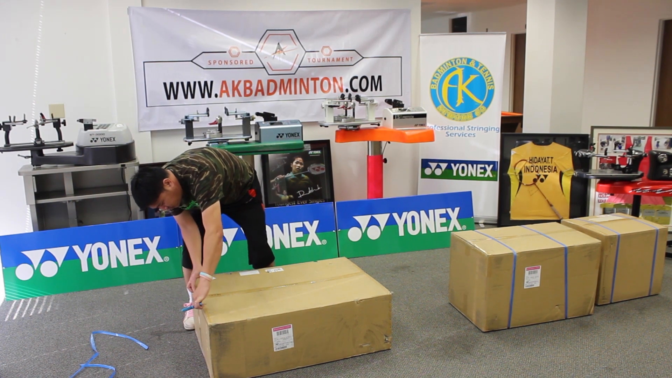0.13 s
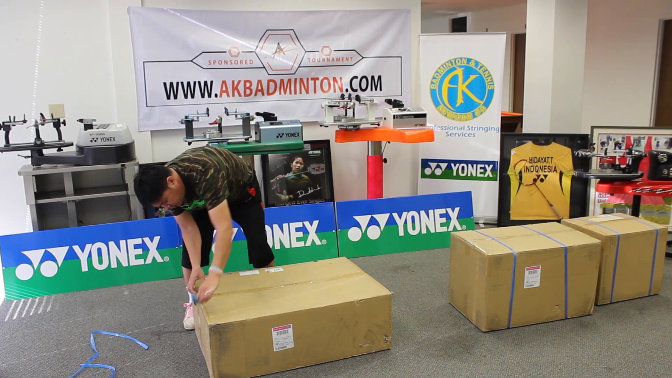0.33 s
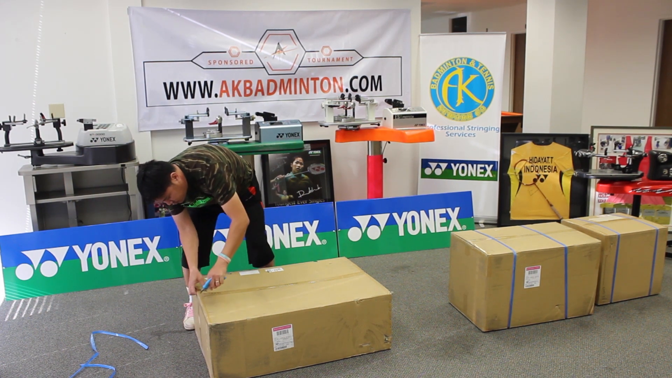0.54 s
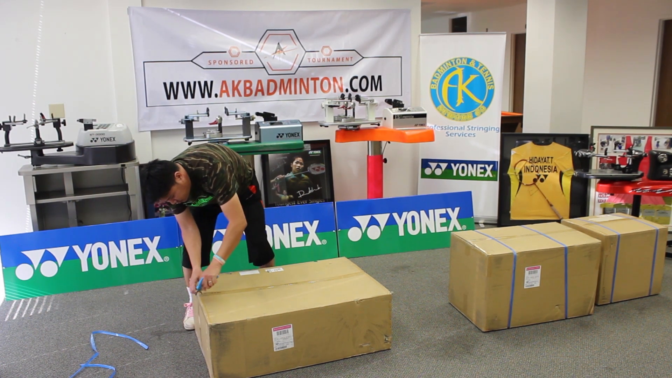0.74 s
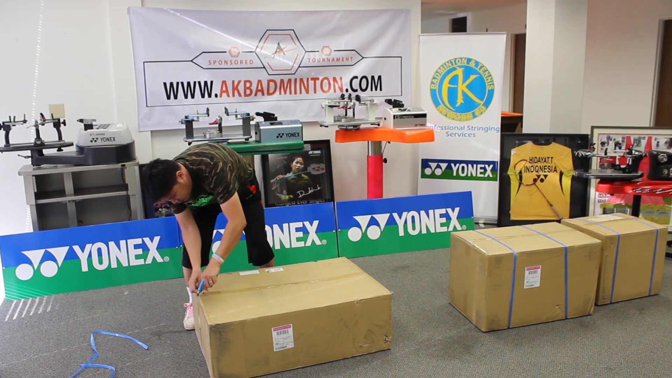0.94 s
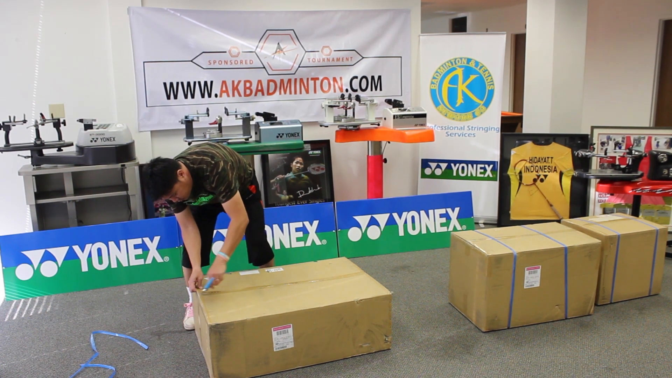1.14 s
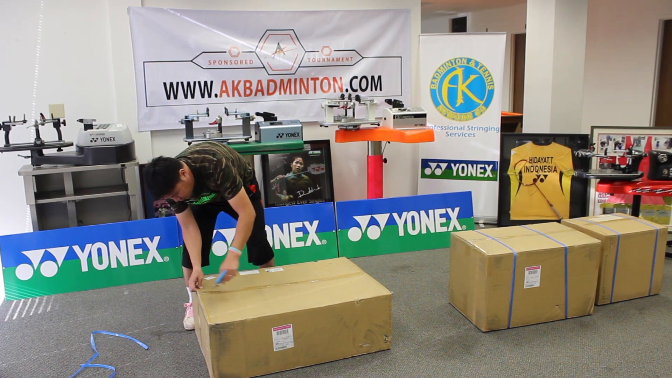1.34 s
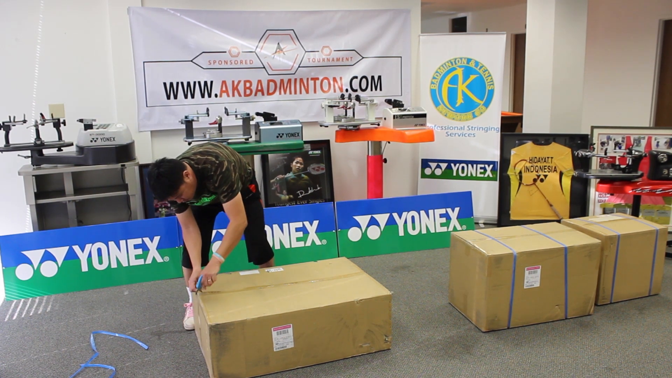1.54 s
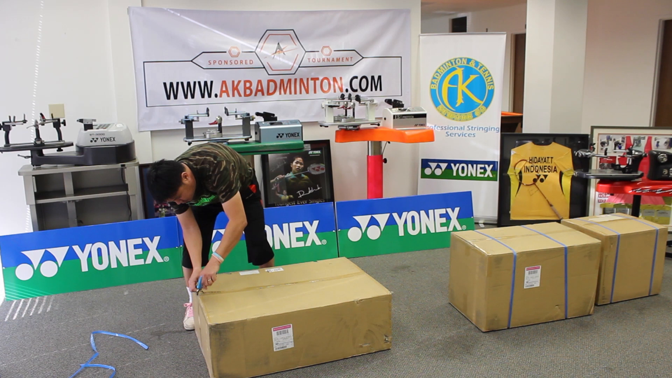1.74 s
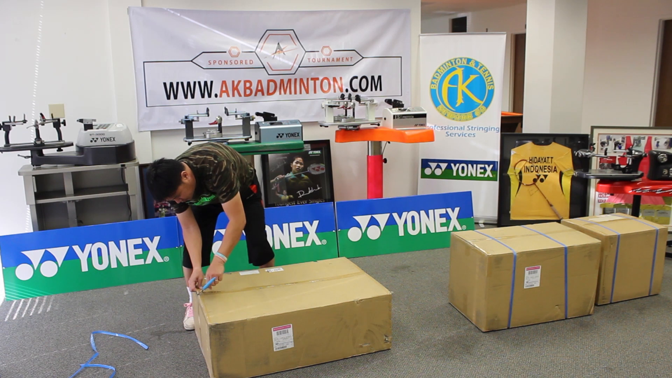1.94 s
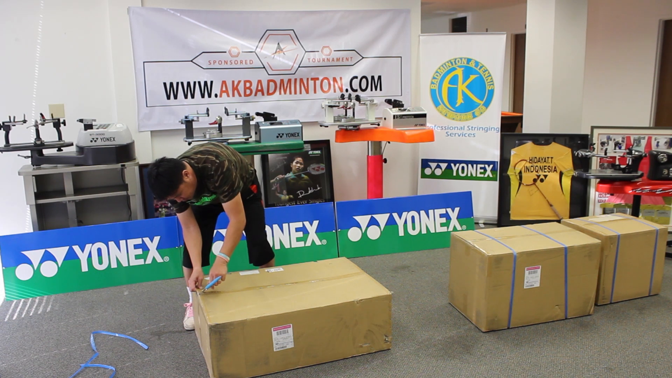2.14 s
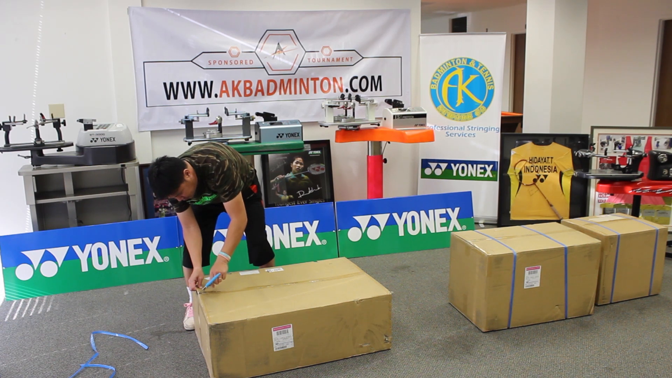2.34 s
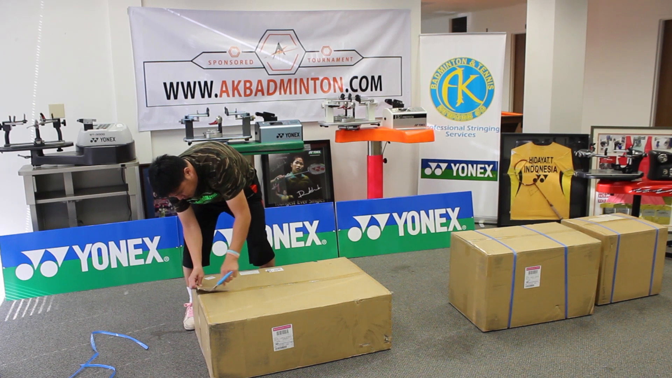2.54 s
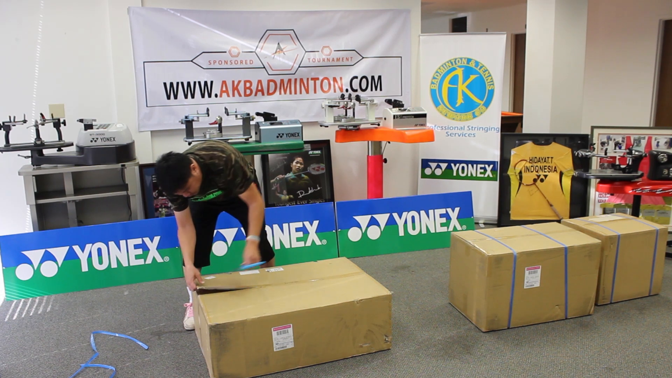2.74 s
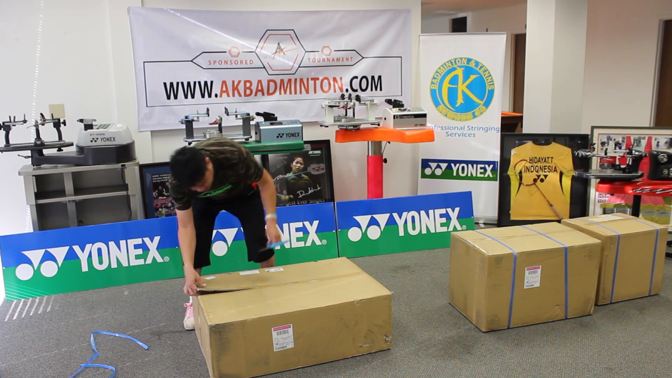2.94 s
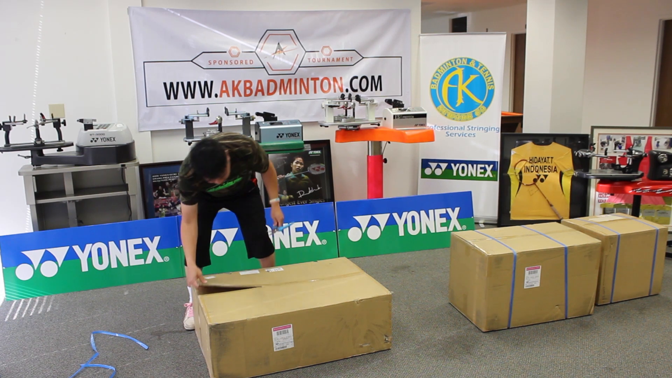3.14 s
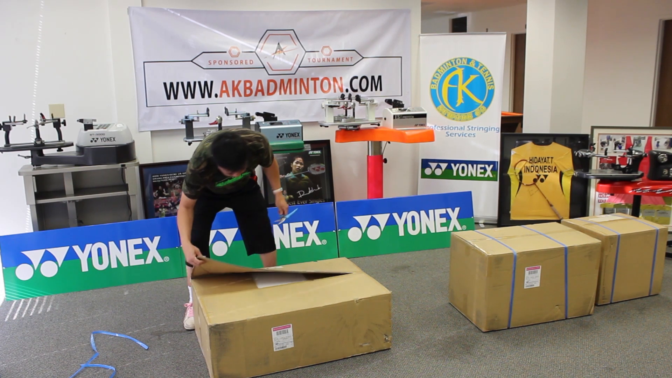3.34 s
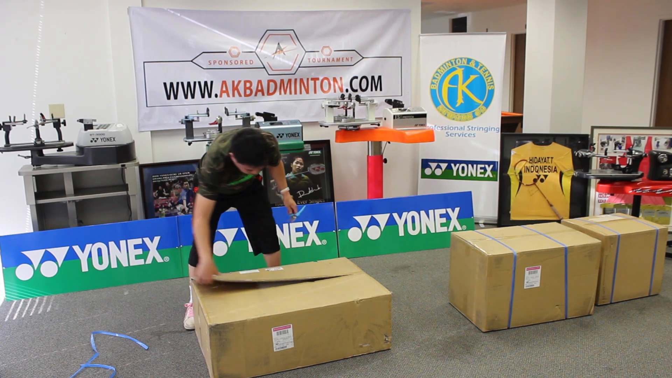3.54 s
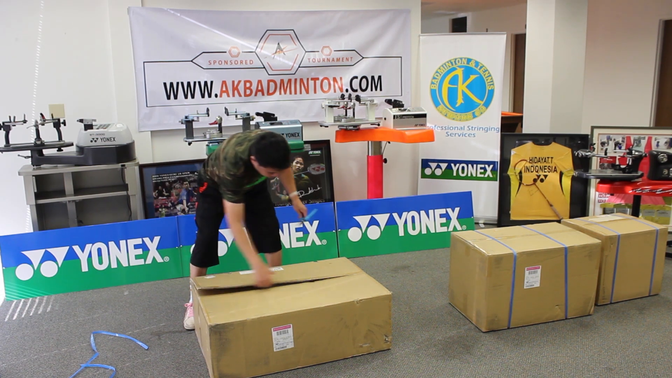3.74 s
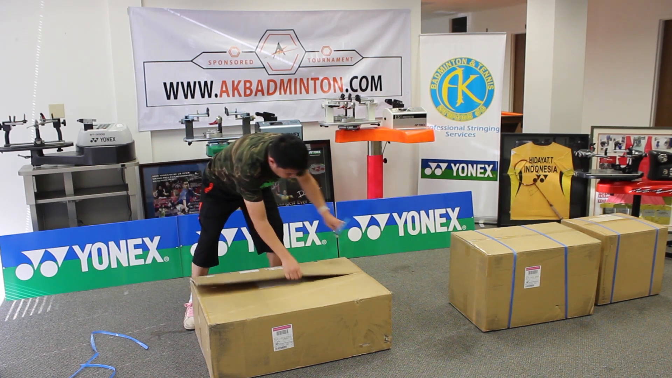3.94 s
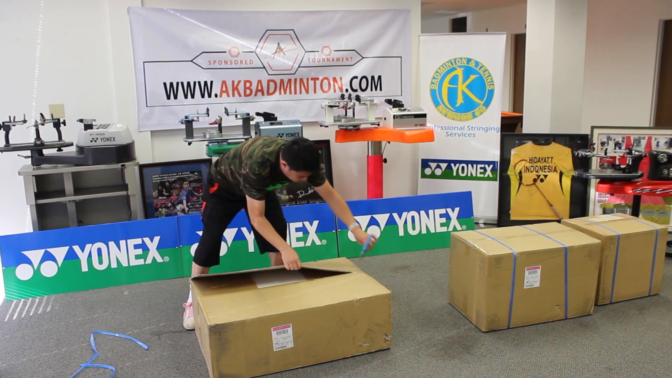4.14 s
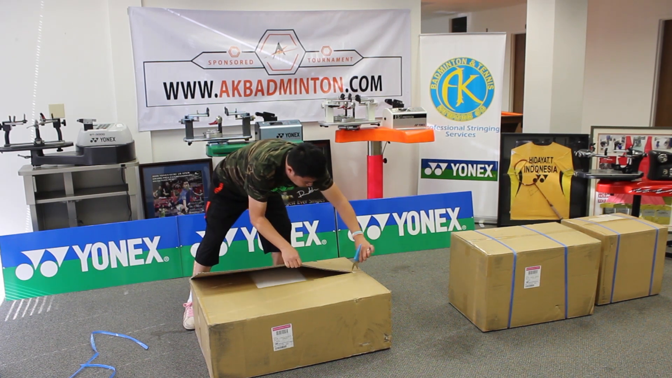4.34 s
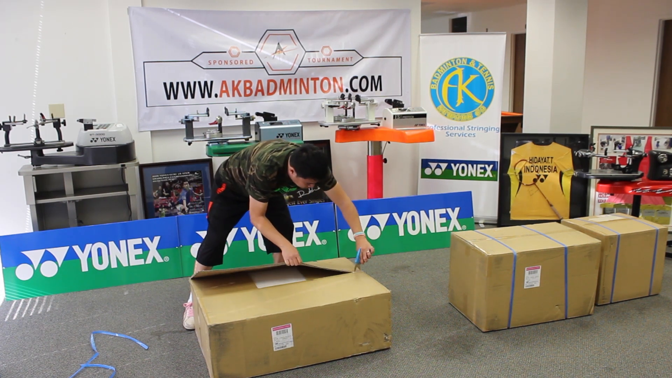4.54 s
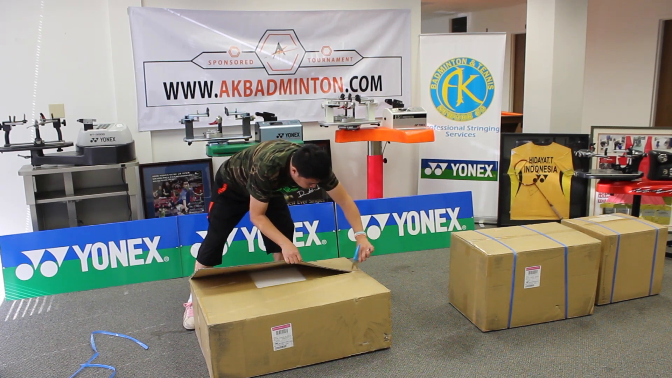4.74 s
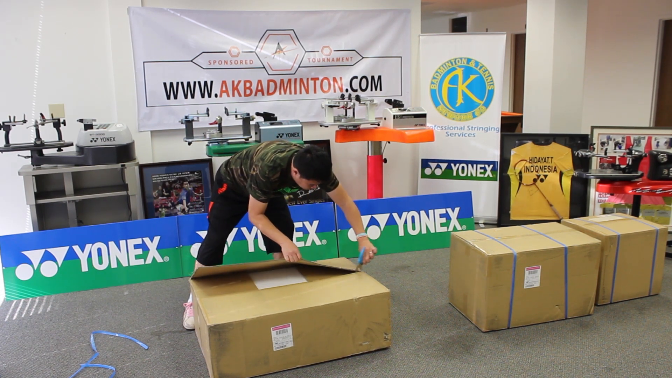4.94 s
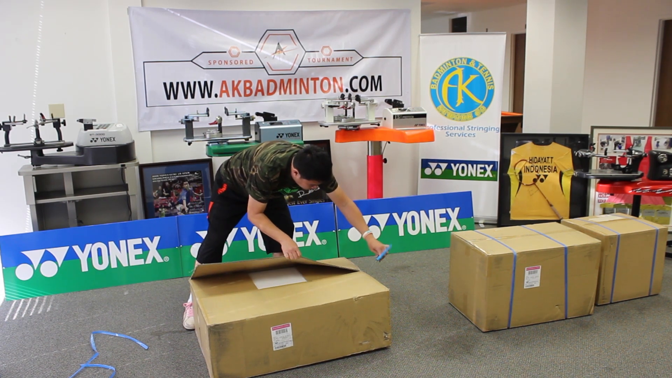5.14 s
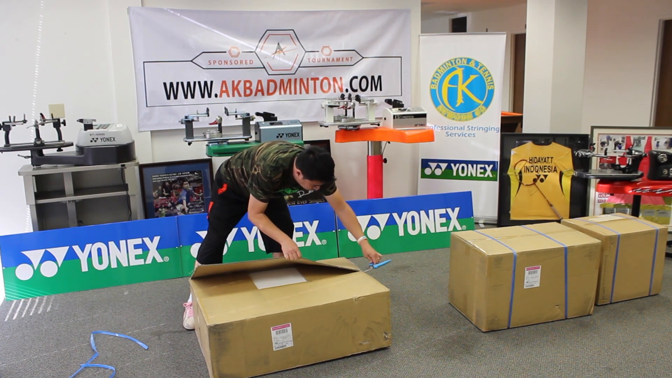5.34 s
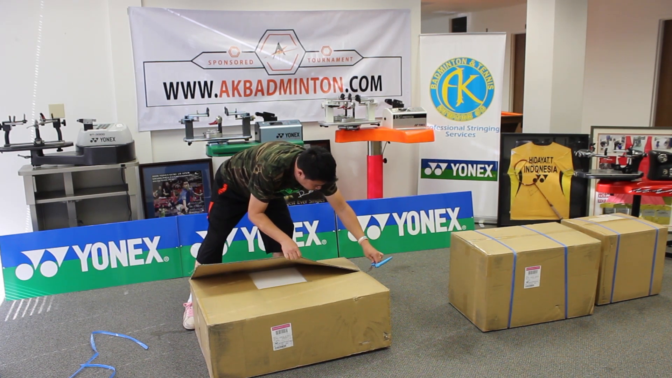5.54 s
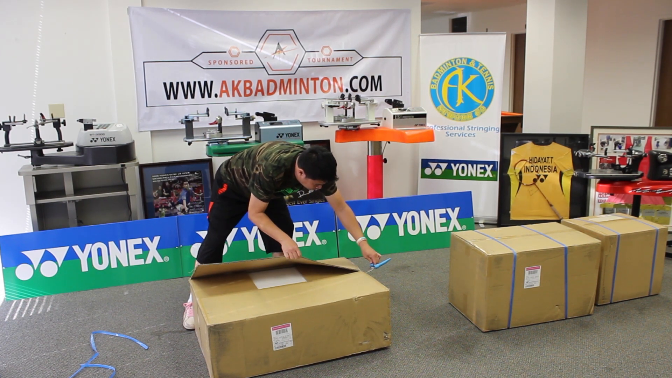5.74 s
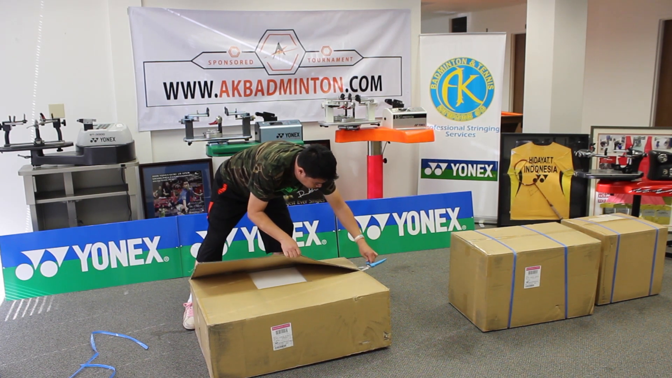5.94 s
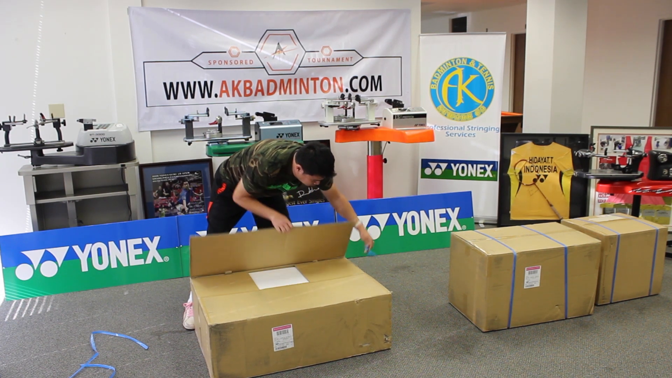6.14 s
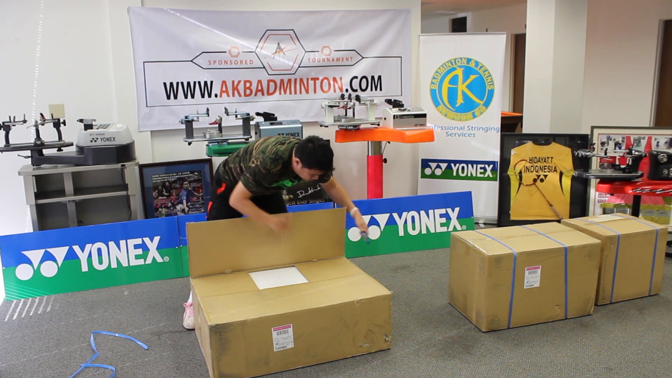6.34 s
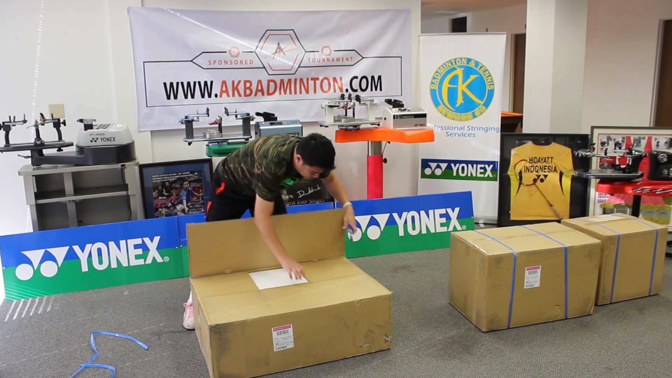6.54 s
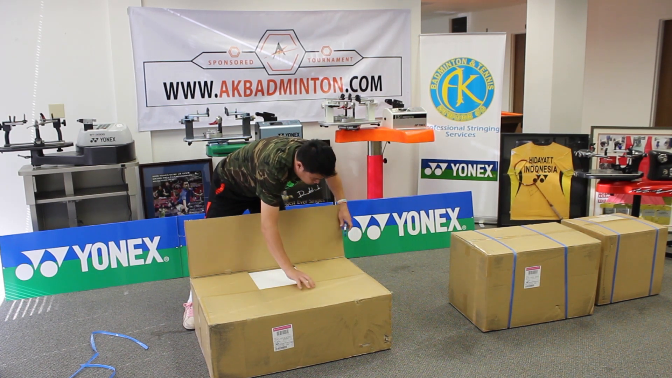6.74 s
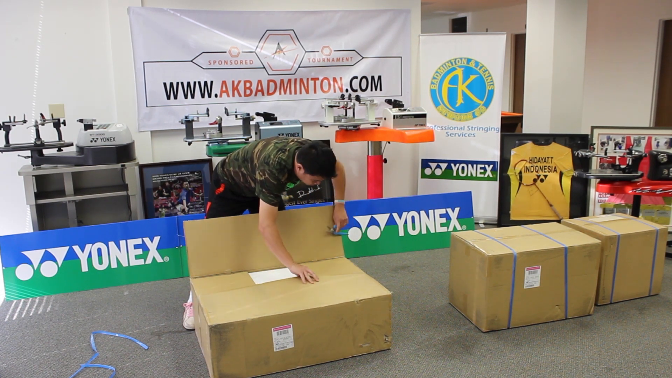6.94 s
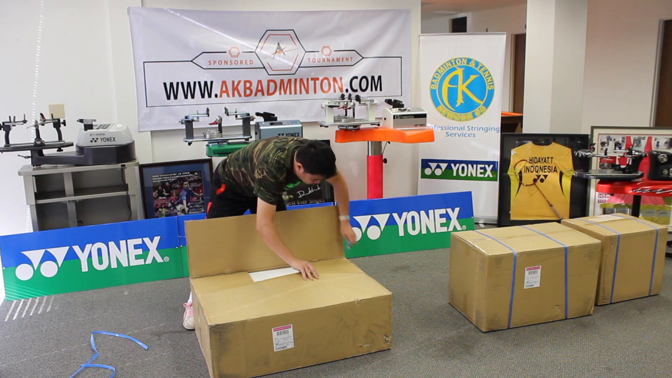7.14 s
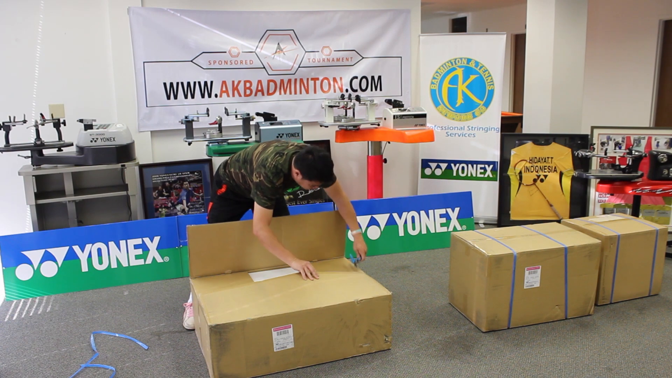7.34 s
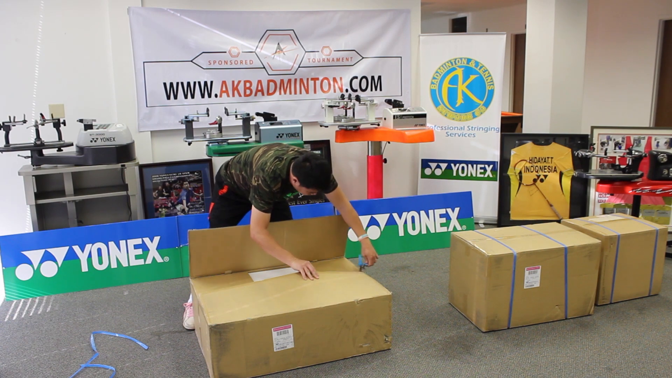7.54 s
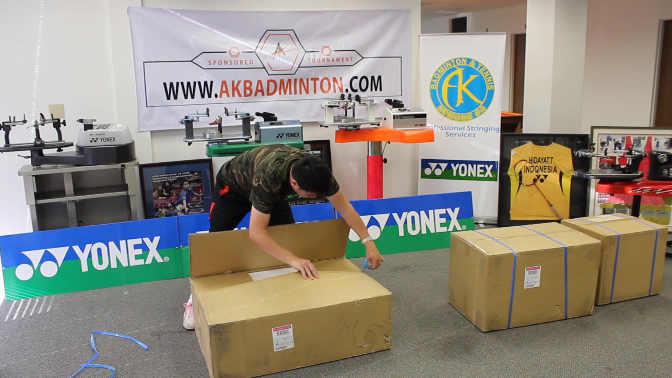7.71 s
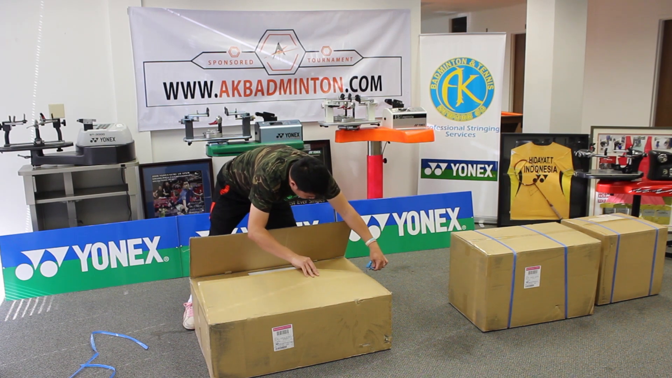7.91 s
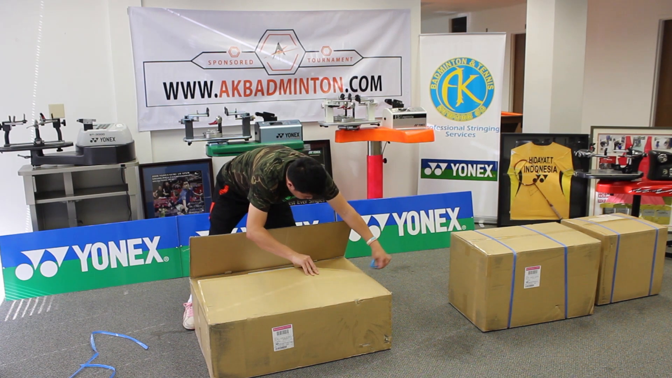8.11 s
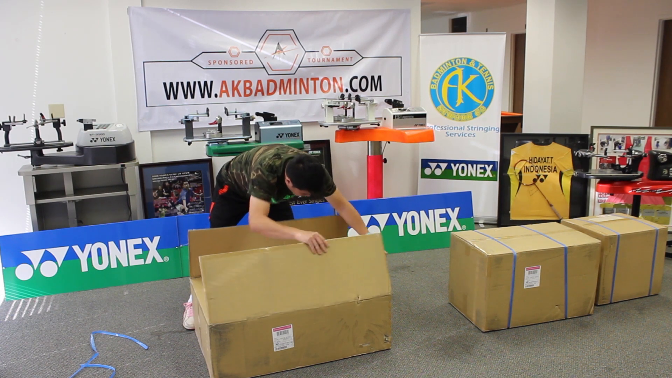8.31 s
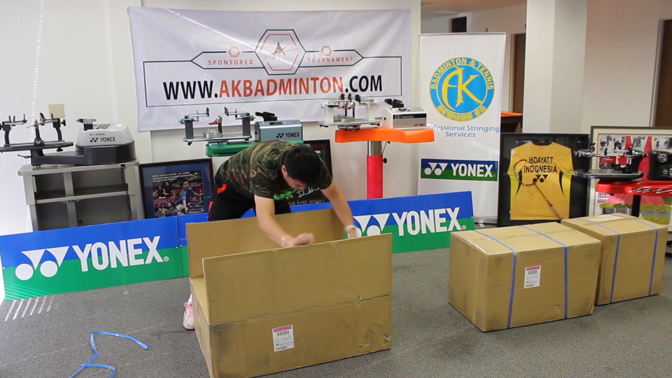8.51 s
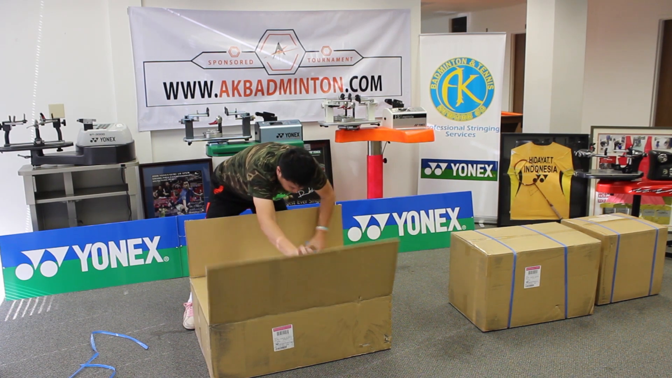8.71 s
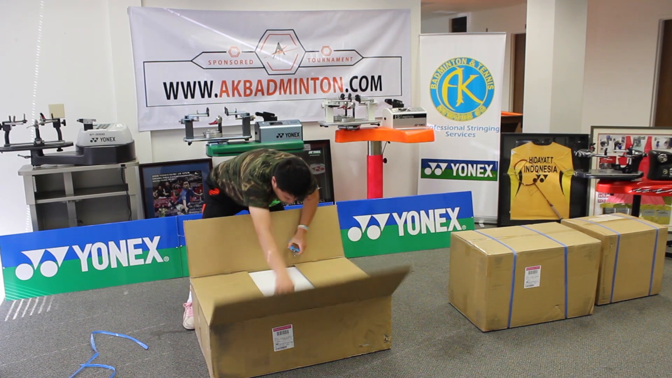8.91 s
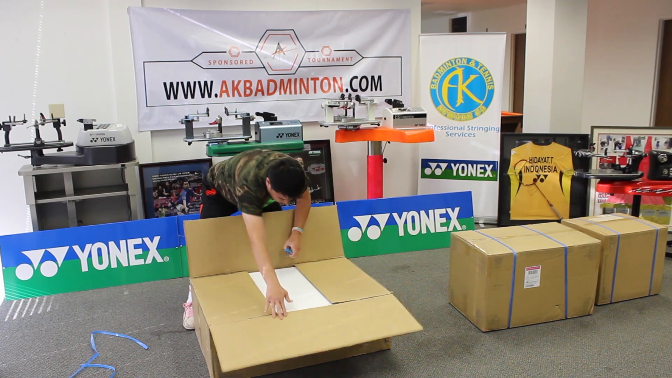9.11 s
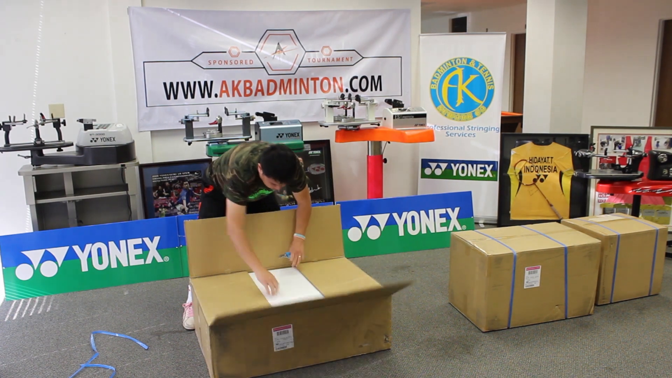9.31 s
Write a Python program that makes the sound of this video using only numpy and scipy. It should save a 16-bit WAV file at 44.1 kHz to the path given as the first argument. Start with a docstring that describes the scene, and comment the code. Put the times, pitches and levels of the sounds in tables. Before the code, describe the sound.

Dry tape crackle and cardboard rubbing come first, with a low hollow drone as the box shifts. Tape tears quickly, then lets go in loud cracks. Quieter fumbling follows, broken by one very short snap, a clustered flap pop, and later two more bursts of flaps pulled up. Roomy, slightly distant camera sound in a shop, with constant ventilation hum and fine hiss.

```python
"""A shop floor, where a large cardboard box is opened a few metres from a camera.
Tape rips and snaps, flaps knock, rub and creak: tiny slips ring the resonances of tape, paper and box.
The box drones as it shifts, over a steady air hum; the shop answers all box sounds with echoes and a tail.
The camera adds a separate hiss to each channel, turns loud sound down, clips its peaks and cuts the top treble."""
import sys
import numpy as np
from scipy import signal
from scipy.fft import rfft, irfft, next_fast_len
from scipy.io import wavfile
from scipy.ndimage import uniform_filter1d

SR = 44100
rng = np.random.default_rng(int(sys.argv[2]) if len(sys.argv) > 2 else 0)


def wav_out(sig):
    """Save sig, one row per channel (or a flat mono array), as 16-bit PCM at SR to the path in sys.argv[1]."""
    wavfile.write(sys.argv[1], SR, np.round(np.clip(np.atleast_2d(sig).T, -1, 1) * 32767).astype(np.int16))


N = 413216

# Ringing tones of the cardboard walls and flaps. Each row: pitch in Hz, time to die by 60 dB in seconds,
# relative level in dB.
WALL_TONES = [(196.4, 0.078, -4.5), (236.7, 0.099, 3), (284, 0.075, 2), (342, 0.2, 0), (393.7, 0.18, 0.5),
              (428.4, 0.31, 1), (488, 0.068, 1)]
FLAP_TONES = [(572.6, 0.058, -7), (676.4, 0.065, -5.5), (746.5, 0.044, -7.5), (867, 0.026, -5),
              (1001, 0.018, -12.5), (1095, 0.1, -5)]


def undb(db):
    """Turn dB into an amplitude factor."""
    return 10 ** (np.asarray(db, float) / 20)


def unit(x):
    """Scale a sound to an rms of 1."""
    return x / np.sqrt(np.mean(x ** 2))


def swell(s, rise, fall):
    """Gain that climbs evenly in dB to 1 at s and sinks again."""
    edge_db = 19.5  # level below the top one rise before s and one fall after it
    t = np.arange(N) / SR - s
    distance = np.maximum(-t / max(rise, .002), t / max(fall, .002))
    return undb(-edge_db * np.clip(distance, 0, 6))


def slips(per_s, spread_db, fill):
    """Tiny slips of very uneven size at random moments, mixed with smooth friction noise."""
    hit = rng.random(N) < per_s / SR
    size = undb(spread_db * rng.exponential(size=N)) * rng.standard_normal(N)
    return unit(unit(hit * size) + fill * rng.standard_normal(N))


def parts(crackle, bright, knock, depth):
    """Levels of the eight parts in dB: brightness tilts tape and paper, depth tilts the box to its bass."""
    # Base levels in dB for tape dull, tape bright, paper dull, paper bright.
    crackle_db = [0, 4, 1, -7.5]
    # Base levels in dB for flaps, walls, hollow, boom.
    knock_db = [-0.5, -3.5, -10.5, -13.5]
    # Where the crackling parts lie, in octaves above the tape's middle.
    crackle_octaves = [-0.3, 0.58, 1.91, 2.5]
    # Where the knocking parts lie, in octaves below the flaps.
    knock_octaves = [0, 1.8, 2.5, 3.2]
    # Hard knocks favour the walls over the bass: dB gained by each knocking part per dB above a usual knock.
    knock_growth = [1.025, 1.132, 0.81, 0.99]
    usual_knock_db = -40

    light = crackle + np.add(crackle_db, bright * np.array(crackle_octaves))
    grown_knock = (knock - usual_knock_db) * np.array(knock_growth) + usual_knock_db
    heavy = grown_knock + np.add(knock_db, depth * np.array(knock_octaves))
    return np.r_[light, heavy]


def ring(x, shapes):
    """Sum of resonances (Hz, width Hz, dB); white noise of rms 1 comes out with rms near 1."""
    out, power = 0, 0
    for k, (hz, width, db) in enumerate(shapes):
        b, a = signal.iirpeak(hz, hz / width, fs=SR)
        sign = (-1) ** k  # neighbours ring in opposite polarity
        out = out + sign * undb(db) * signal.lfilter(b, a, x)
        power += undb(db) ** 2 * np.pi * width / SR
    return out / np.sqrt(power)


def widths(modes):
    """A mode that dies 60 dB in t60 is ln(1000) / (pi t60) Hz wide."""
    return [(hz, np.log(1000) / (np.pi * t60), db) for hz, t60, db in modes]


def hum():
    """Steady air handling and far street noise: random noise coloured by a fixed spectrum."""
    # Tone colour of the hum. Each row: frequency in Hz, relative spectral level in dB per Hz.
    colour_points = [(15, -44), (25, -14), (65, -1.5), (92, -10.5), (171, -11), (324, -16.5), (826, -14),
                     (889, -13.5), (1080, -12), (1350, -16.5), (2050, -24.5), (2900, -16), (3900, -24),
                     (4980, -19.5), (9000, -27.5), (11700, -24), (19800, -120)]
    level_db = -52.5  # rms
    hz, db = np.transpose(colour_points)
    size = next_fast_len(N)
    bins = np.fft.rfftfreq(size, 1 / SR) + 1  # 1 Hz up, to keep the logarithm finite
    colour = undb(np.interp(np.log(bins), np.log(hz), db))
    noise = irfft(rfft(rng.standard_normal(size)) * colour, size)[:N]
    return undb(level_db) * unit(noise)


def rub():
    """Sliding contact: grainy friction that flutters as the grip changes, with drones of the shifting box."""
    # Hands, tape and flaps rubbing. Each row: strongest moment, rise and fall in seconds, crackle in dB,
    # brightness in dB per octave, knock in dB; levels before the stroke trim and part balance.
    strokes = [(0.25, 1, 0.15, -39, 2, -37), (0.63, 0.23, 0.37, -43.5, 0, -54),
               (1.23, .1, 0.17, -46.5, 0, -40), (2.62, 0.18, 0.34, -34, 2.5, -34),
               (3.26, 0.074, 0.53, -38, 1, -39), (3.66, .1, 0.29, -50.5, 3.5, -64),
               (3.91, 0.26, 0.15, -46.5, 5, -66), (4.45, 1, 0.57, -54, 2, -52),
               (4.74, 0.18, 0.072, -45, 1, -46.5), (5.08, 0.087, 0.2, -36, 0, -36),
               (6.16, 0.23, 0.28, -32.5, 1, -34.5), (6.85, 0.16, 0.22, -51, 4, -48.5),
               (7.25, 0.28, 0.25, -43.5, 1.5, -42.5), (8.05, 0.37, 0.34, -42.5, 2, -40),
               (8.35, 0.13, 0.25, -36, -0.5, -38), (9.0, 0.33, 0.28, -44.5, 4.5, -42.5),
               (9.12, .08, 0.12, -49, -10, -45), (9.28, 0.22, 0.04, -44, 1.5, -51),
               (0.46, .08, 0.064, -44, 1, -58), (1.4, .02, 0.063, -53, -16, -62),
               (8.65, .1, 0.052, -50.5, 5.5, -62), (8.88, .06, .1, -50, 2, -40),
               (5.17, .03, 0.066, -56, 3, -45)]
    # The box shifts under the man's weight and drones. Each row: strongest moment, rise and fall in seconds,
    # drive of the hollow and of the boom in dB.
    drones = [(0.0, .01, 0.038, -40, -68), (0.18, .13, 0.13, -34.5, -58), (1.224, 0.083, 0.12, -41, -57),
              (1.35, 0.17, 0.031, -44.5, -71), (6.045, .03, .03, -50, -33), (6.572, 0.022, 0.039, -43, -39),
              (7.3, 0.072, .1, -51, -60), (8.83, 0.036, 0.024, -34, -28.5), (8.89, .04, .06, -42, -42),
              (9.012, 0.079, 0.056, -45, -36), (9.168, .015, .04, -50, -47)]
    trim_db, depth = -5, 1.6  # dB, dB per octave

    step = SR // 40  # the grip drifts to a new random strength every 25 ms
    grip = np.repeat(rng.standard_normal(N // step + 1), step)
    flutter_db = 1.5 * uniform_filter1d(grip, step)[:N]
    # strokes drive tape, paper, flaps and walls; drones drive hollow and boom
    light = sum(np.outer(undb(parts(*row[3:], depth)[:6]), swell(*row[:3])) for row in strokes)
    heavy = sum(np.outer(undb(row[3:]), swell(*row[:3])) for row in drones)
    strength = np.vstack([light * undb(trim_db + flutter_db), heavy])
    return strength * slips(per_s=2000., spread_db=3.5, fill=1.8)


def snaps():
    """Each snap is a burst of slips that starts fast and dies out; the heavy parts feel one blow."""
    # Tape snaps and flap knocks. Each row: start in seconds, crackle in dB, brightness in dB per octave,
    # knock in dB, depth in dB per octave, time for the burst to fall to 1/e in ms;
    # levels before the trims and part balance.
    events = [(0.151, -37, -0.5, -39, 2, 43), (0.379, -30, 1, -38, -3, 6.2), (0.424, -45.5, 3, -64, 5, 17),
              (0.463, -41.5, 0, -47, 0.5, 21), (0.557, -37, -3, -41, -7, 6.2),
              (0.579, -35.5, -1, -43, -5, 7), (0.627, -36, -3, -41.5, -1.5, 11),
              (0.711, -45.5, 1, -46.5, 1, 12), (0.8, -43.5, -2, -53, 2.5, 9.6),
              (1.037, -35, -1, -34, -3.5, 6.4), (1.202, -41, 3.5, -44, 1, 7.7),
              (1.226, -43.5, 2, -38.5, 2.5, 17), (1.38, -42, -18, -54, -1, 7),
              (1.656, -52, -6, -48, 4.5, 23), (2.286, -46.5, 4.5, -39.5, -6.5, 10.6),
              (2.399, -43.5, 5.5, -50, 2.5, 2.8), (2.473, -44, 2, -43, 0, 4.9),
              (2.497, -40, -6, -39.5, 1, 21), (2.525, -33, 0, -34.5, 4, 25), (2.547, -42, 1, -39, 4, 16),
              (2.5671, -40.5, 6.5, -40, 6, 9.8), (2.594, -37, 3, -33.5, 0, 11),
              (2.622, -34.5, 4, -46, -4, 6.6), (2.675, -32, 1, -54, 3, 3.3), (2.694, -35, 4, -50, 0, 13),
              (2.705, -33.5, 0, -42, 1.5, 27), (2.723, -35, 5, -41, 0.5, 13),
              (2.733, -31, 4, -31.5, 0.5, 18.4), (3.042, -45.5, -4, -41, -1, 8.1),
              (3.089, -52, 3, -39, 2, 5.7), (3.125, -43.5, 0.5, -44, 5, 19), (3.213, -44.5, 3, -49, 0, 29),
              (3.2613, -14, 0, -14.5, -1.5, 12.5), (3.283, -30, 4.5, -18.5, -7, 7.2),
              (3.289, -21, 4.5, -24.5, 2.5, 27), (3.3377, -12, -1.5, -13, -1.5, 8),
              (3.3484, -24, 8, -19, 0.5, 9.5), (3.365, -19, 3.5, -34.5, 5, 9.1),
              (3.611, -38.5, -1, -46, -3, 3.5), (3.639, -42, -4, -42, -3, 19),
              (3.744, -36, -1.5, -61, 6, 20), (4.0548, -37, 0.5, -47, 0.5, 26),
              (4.101, -40, -1.5, -47.5, 0.5, 25), (4.2821, -36.5, -14, -28.5, -3, 7.7),
              (4.477, -51, -11, -43.5, 2.5, 9.8), (4.566, -44, -8, -39, -6, 7),
              (4.91, -40, 0.5, -41.5, 2.5, 23), (4.968, -45.5, 6, -33, -5, 9.3),
              (4.992, -8.5, 1, -10.5, 0.5, 4.4), (5.358, -51, -4, -46.5, -2, 9.2),
              (5.8192, -45.5, 0, -42, -3.5, 6.2), (5.899, -59, 1, -39, -10, 7.1),
              (5.944, -61, 0, -54.5, 6.5, 7), (5.996, -40.5, -1.5, -42.5, 5, 26),
              (6.0275, -23, 2, -26, -3, 18.5), (6.064, -20, 2, -11, -9, 10.2),
              (6.0755, -11.5, 1.5, -18, 1, 9.6), (6.086, -15.5, -1, -38, 0, 6.5),
              (6.27, -27, -4, -26.5, -7.5, 8.1), (6.398, -47, 4, -71, 9, 12),
              (6.537, -41, 1.5, -45.5, 5.5, 26), (6.761, -50, 1.5, -45, -1, 31),
              (6.783, -44.5, 2, -54.5, 7, 12), (6.859, -43, -1, -44.5, 1, 26), (6.939, -49, 3, -61, 6, 9),
              (7.03, -49, 0, -38.5, -10, 6.1), (7.1746, -32.5, -3, -30, -2, 12.6),
              (7.252, -48, -14, -47, 3.5, 5.4), (7.3013, -37.5, -5.5, -34.5, 1.5, 9.6),
              (7.616, -54, 4.5, -47.5, 2, 15), (7.679, -49, -13, -41.5, 2, 7.1),
              (7.731, -54.5, 2.5, -44, 1.5, 10), (7.87, -30, 1.5, -24, -2, 16),
              (7.877, -27, 1.5, -26, 3, 33), (7.902, -20.5, -2, -26.5, 3.5, 11),
              (8.125, -45, -5, -38, -1, 6.2), (8.197, -36, 0.5, -31, -0.5, 28),
              (8.23, -12.5, 1.5, -17.5, 2.5, 12.4), (8.242, -14, -1.5, -48, 10.5, 5.2),
              (8.275, -20, 0.5, -31, -10, 2.4), (8.446, -43, 2, -32.5, 0, 12.5),
              (8.64, -51, -0.5, -46.5, 5.5, 23), (8.719, -46, -7, -38.5, -1.5, 8.2),
              (8.815, -43, 1, -40, 6, 59), (8.85, -41, 1, -40, 6, 13), (8.885, -60, 5, -40.5, 6, 5.5),
              (9.161, -53, -11, -56, 7.5, 10)]
    rise, hold = 0.0067, 1.04  # rise as a share of the fall time; exponent of the fall
    light_db, heavy_db, tick_db = 2, 2, 12  # trims of bursts, blows and ticks in dB

    bursts, ticks, blows = np.zeros((5, N)), np.zeros((5, N)), np.zeros((3, N))
    t_ms = 1000 * np.arange(SR // 10) / SR
    for s, *strength, ms in events:
        i = int(s * SR)
        fall_ms = max(ms, .5)
        u = t_ms / fall_ms
        shape = (np.exp(-u ** hold) * (1 - np.exp(-u / rise)))[:N - i]
        # light: tape, paper, flaps; heavy: walls, hollow, boom
        light, heavy = np.split(parts(*strength), [5])
        bursts[:, i:i + len(shape)] += undb(light + light_db)[:, None] * shape
        # the first fibre to let go gives a clean tick, sharper in short bursts
        ticks[:, i] += undb(light + tick_db) * np.sqrt(10 / fall_ms)
        # before its trim, a blow carries the energy of a steady 10 ms burst
        blows[:, i] += undb(heavy + heavy_db) * np.sqrt(SR / 100)
    crackle = bursts * slips(per_s=5000., spread_db=3.0, fill=1.8)
    return np.vstack([crackle + ticks, blows])


def body(drive):
    """Eight parts ring to slips: dull and bright tape, dull and bright paper, flaps, walls, hollow, boom."""
    # Broad resonances of tape and paper, a dull and a bright half each.
    # Each row: centre in Hz, width in Hz, relative level in dB.
    tape = [
        [(1200, 398, 0), (1860, 470, 0.5)],
        [(2783, 930, 0.5), (4040, 1900, -1.5)],
    ]
    paper = [
        [(5170, 1200, 1), (6660, 1230, -3.6)],
        [(9160, 2740, 6.5), (13260, 4000, -3.5)],
    ]
    # Tones of the hollow inside and of the whole box on the floor.
    # Each row: pitch in Hz, time to die by 60 dB in seconds, relative level in dB.
    hollow_tones = [(113, 0.2, 4.5), (129.6, 0.44, 5), (153, 0.17, -0.5), (181, 0.32, -2)]
    boom_tones = [(37.4, 0.12, -9), (60.4, 0.21, -1), (90, 0.33, 0)]
    box = [widths(tones) for tones in (FLAP_TONES, WALL_TONES, hollow_tones, boom_tones)]
    return sum(ring(x, part) for x, part in zip(drive, tape + paper + box))


def creak():
    """A flap sticks and slips: nearly even pulses, slowing as the push fades, strike walls and flaps."""
    # Creaks of a flap against a panel. Each row: strongest moment, rise and fall in seconds, level in dB.
    pushes = [(0.191, 0.035, 0.052, -26.5), (1.238, 0.0095, .01, -36)]
    slip_hz, sag_after_s, sag_hz_per_s = 290, 0.0353, 1000
    jitter = 0.033  # rms share by which the slip rate wanders

    out, t = np.zeros(N), np.arange(N) / SR
    for s, rise, fall, db in pushes:
        hz = slip_hz - sag_hz_per_s * np.clip(t - s - sag_after_s, 0, .07)
        wobble = 1 + jitter * unit(uniform_filter1d(rng.standard_normal(N), SR // 200))
        cycles = np.cumsum(hz * wobble) / SR
        # one pulse per whole cycle, scaled to an rms near 1
        pulses = np.diff(np.floor(cycles), prepend=0) * np.sqrt(SR / hz)
        out += pulses * undb(db) * swell(s, rise, fall)
    return ring(out, widths(WALL_TONES + FLAP_TONES))


def shop(x):
    """Direct sound, weaker echoes from near shelves, then the far wall's dense tail; bass lasts longest."""
    # Echo bands of the shop. Each row: centre in Hz, time to die by 60 dB in seconds, relative level in dB.
    bands = [(58, 0.8, -10), (247, 0.35, -7.5), (458, 0.31, -6), (950, 0.22, -4.5), (4000, 0.28, -5),
             (8000, 0.19, -3), (14200, 0.1, -5.5)]
    gap_ms, near_db = 0.82, -5  # silence before the near echoes; their level against the far tail
    far_ms, far_build_ms = 40.0, 5.  # start and build-up of the far tail

    t = np.arange(SR) / SR
    hz = np.fft.rfftfreq(SR, 1 / SR)
    noise, tail = rfft(rng.standard_normal(SR)), 0
    centres = np.log([row[0] for row in bands])
    far = np.clip((1000 * t - far_ms) / far_build_ms, 0, 1)
    onset = (1000 * t > gap_ms) * (undb(near_db) * (1 - far) + far)
    for k, (_, t60, db) in enumerate(bands):
        # each band fades into its neighbours
        share = np.interp(np.log(hz + 1), centres, np.arange(len(centres)) == k)
        decay = onset * 1000. ** (-t / t60)
        band_noise = irfft(noise * share, SR)
        tail = tail + undb(db) * band_noise * decay / np.sqrt(np.sum(decay ** 2))
    return x + signal.fftconvolve(x, tail)[:N]


def scene():
    """Box sounds echo in the shop over the hum, alike in both channels."""
    box = body(snaps() + rub()) + creak()
    return np.tile(shop(box) + hum(), (2, 1))


def follow(x, attack_s, release_s):
    """Envelope that rises fast and falls slowly: the highest past level, each faded by its age."""
    keep = np.exp(-1 / (attack_s * SR))
    age = np.arange(len(x)) / (release_s * SR)
    smooth = signal.lfilter([1 - keep], [1, -keep], x)
    return np.exp(np.maximum.accumulate(np.log(smooth + 1e-9) + age) - age)


def record(dry):
    """Each channel hisses on its own; loud sound turns the shared gain down, which creeps back; peaks clip."""
    hiss_db, knee_db, slope = -54.5, -20, 0.74  # noise drive, gain-control knee, steepness of turning down
    attack_s, release_s, top_hz = 0.088, 0.12, 15900
    hiss = signal.lfilter([1], [1, -.05], rng.standard_normal(dry.shape))
    wet = dry + undb(hiss_db) * hiss
    loud = follow(np.abs(np.mean(wet, axis=0)), attack_s, release_s)
    gain = (1 + loud / undb(knee_db)) ** -slope
    clipped = np.clip(wet * gain, -1.1, 1.1)
    # steep low-pass: almost nothing is left above top_hz
    low_pass = signal.ellip(10, .2, 80, top_hz, fs=SR, output="sos")
    return signal.sosfilt(low_pass, clipped)


dry = scene()
out = record(dry)
wav_out(out)
```